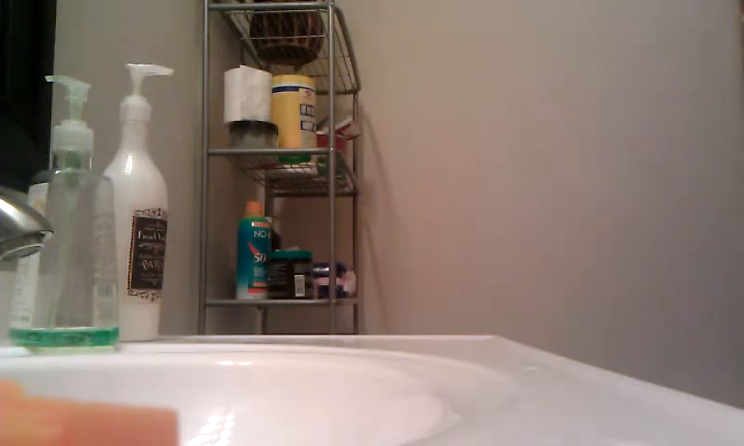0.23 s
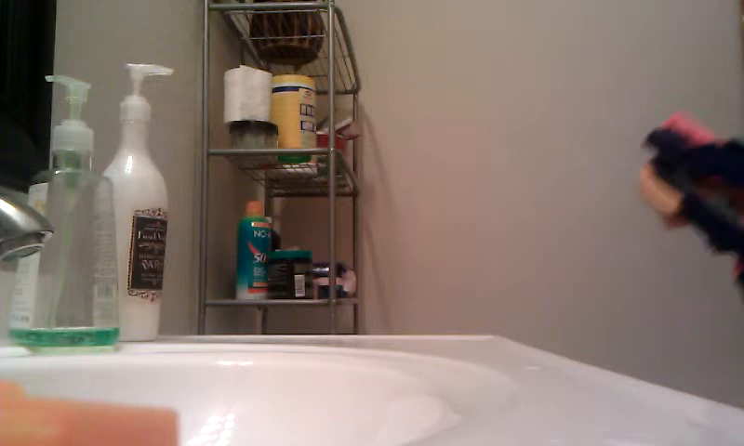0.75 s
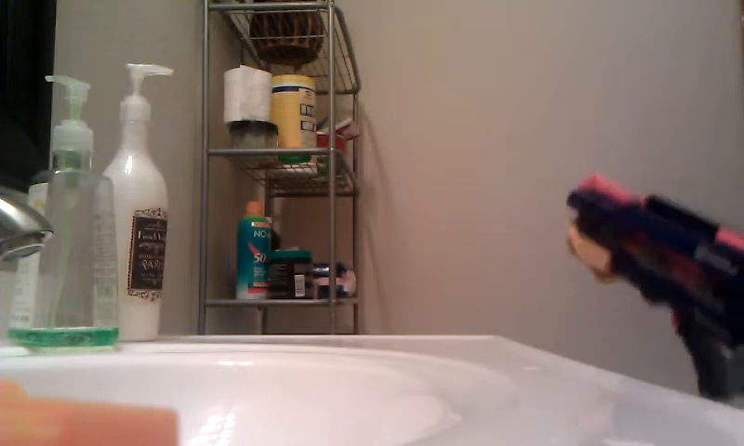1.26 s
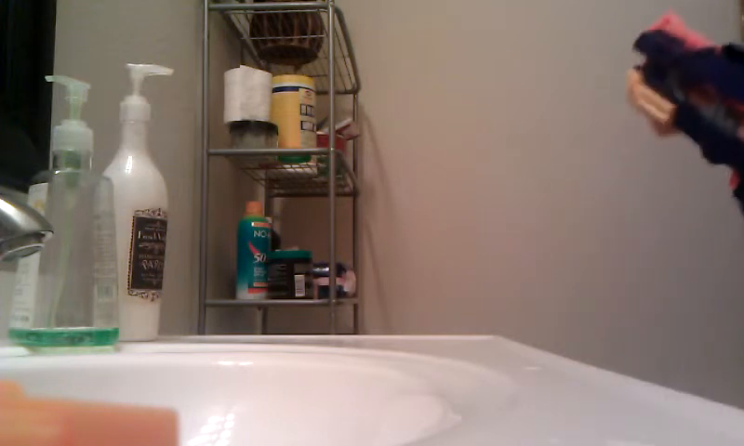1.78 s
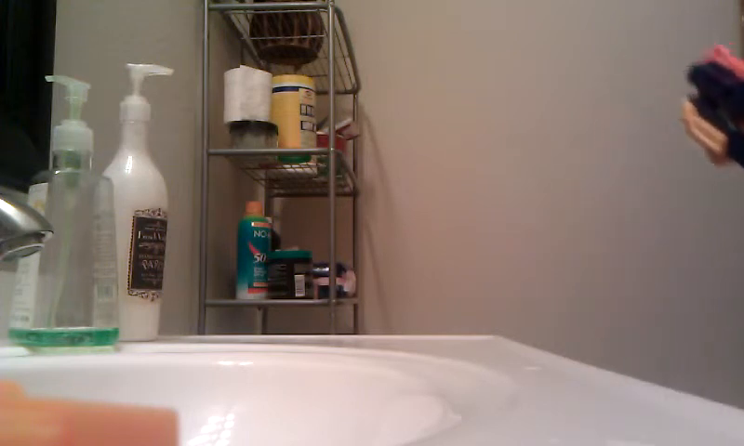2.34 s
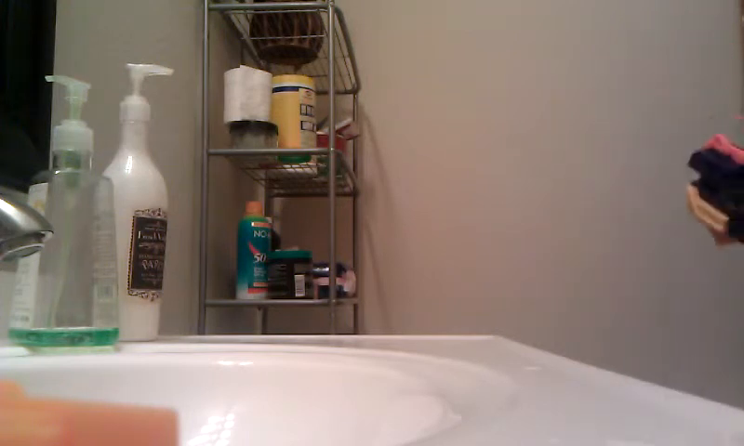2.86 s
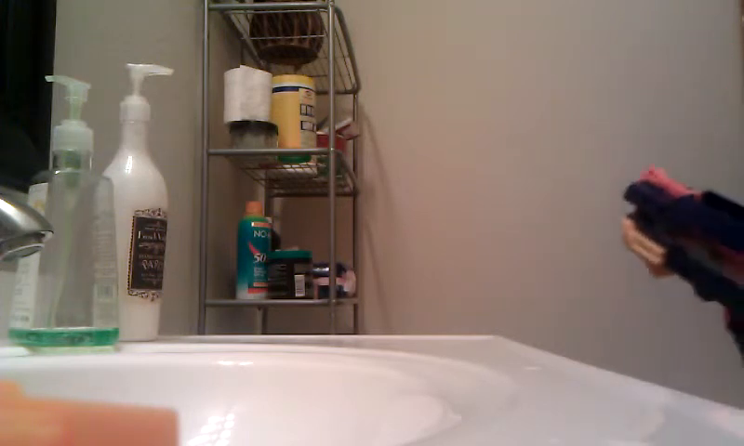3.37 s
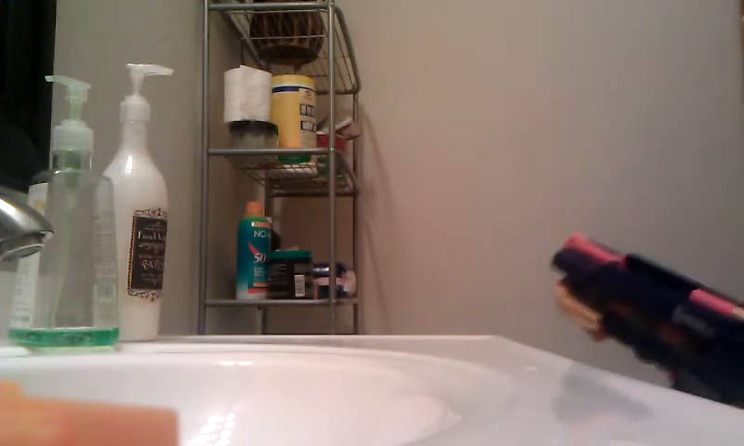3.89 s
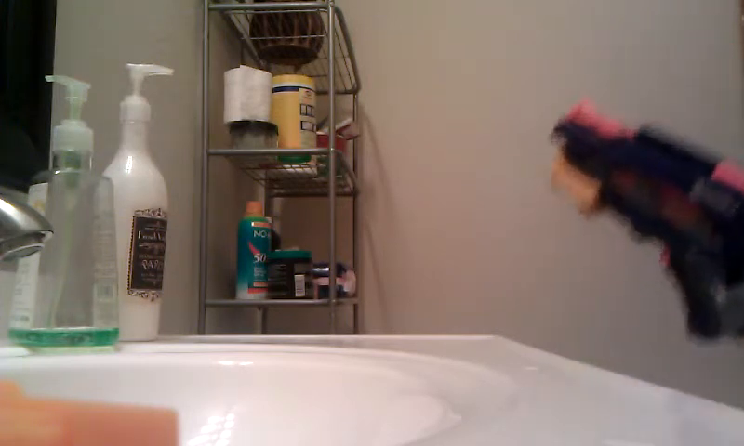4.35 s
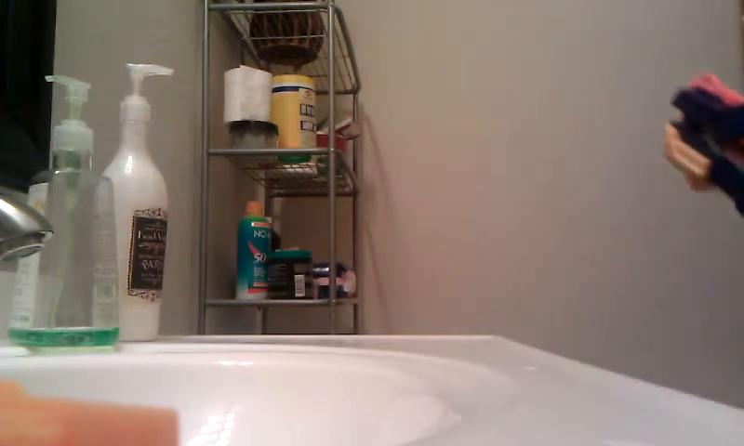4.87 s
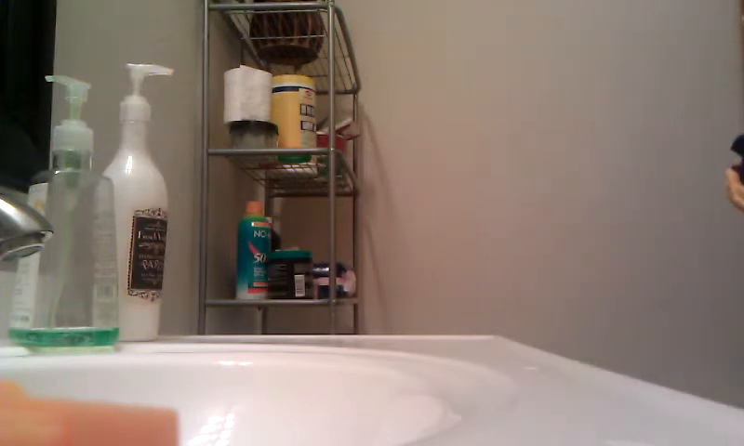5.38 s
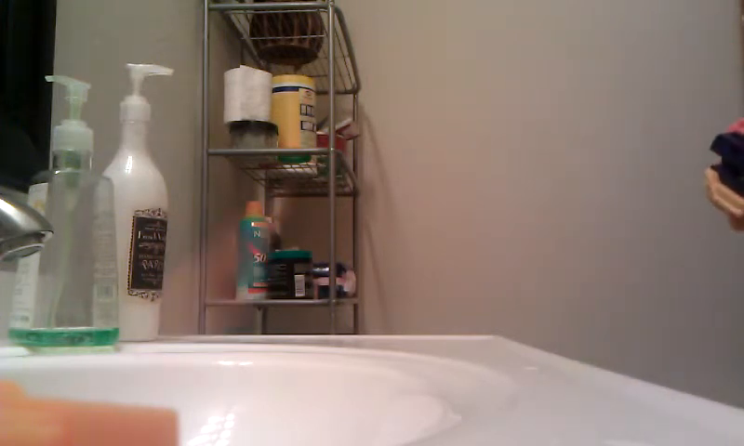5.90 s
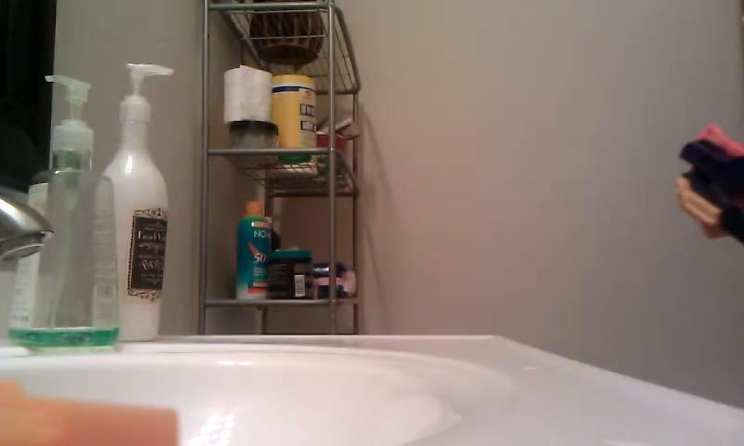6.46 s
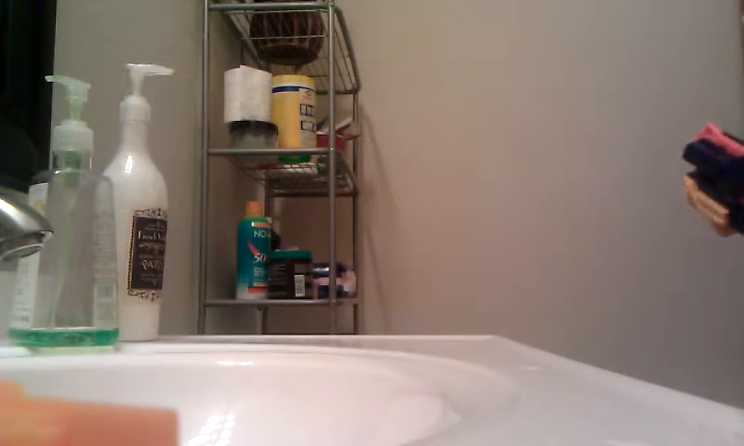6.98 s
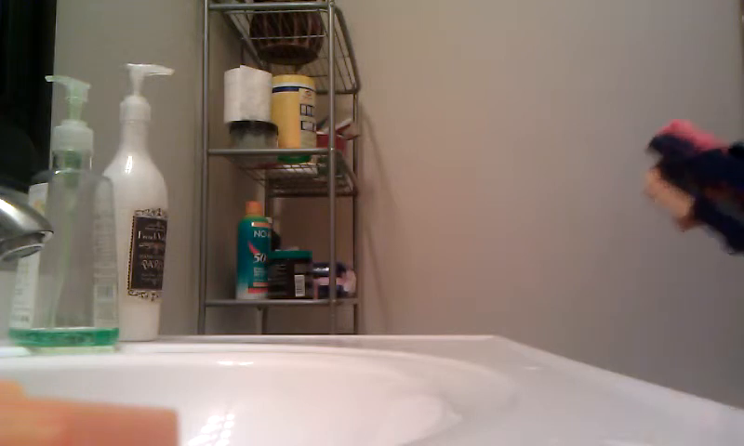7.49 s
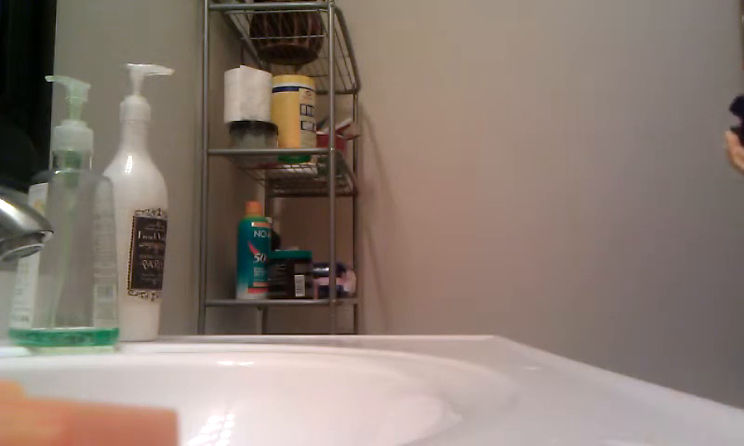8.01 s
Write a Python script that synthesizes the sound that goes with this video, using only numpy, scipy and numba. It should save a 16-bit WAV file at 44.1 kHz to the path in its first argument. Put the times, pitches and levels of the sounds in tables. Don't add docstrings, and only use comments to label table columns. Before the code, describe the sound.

Busy hard plastic clacks, pops and rattles of a toy gun being handled and shot twice, boxy and overloaded in a reverberant bathroom.

```python
import sys
import numpy as np
from scipy import signal
from scipy.io import wavfile
from scipy.ndimage import uniform_filter1d
from numba import njit

SR = 44100
rng = np.random.default_rng(int(sys.argv[2]) if len(sys.argv) > 2 else 0)


def volts_from_decibels(level):
    exponent = np.asarray(level, float) / 20
    return 10 ** exponent


def pcm_store(signal):
    levels = np.round(np.clip(np.atleast_2d(signal), -1, 1) * 32767)
    wavfile.write(sys.argv[1], SR, levels.astype(np.int16).T)


N = 363825
CLACK_N = 1500


def rms_one(x):
    return x / np.sqrt(np.mean(x ** 2) + 1e-20)


def at_hz(points, hz):
    table_hz, values = np.transpose(points)
    return np.interp(np.log(hz), np.log(table_hz), values)


def band(x, low, high):
    return signal.sosfilt(signal.butter(2, [low, high], "band", fs=SR, output="sos"), x)


def clack(level_db, bright_db, ring_hz, wide_db, ring_db, chance):
    low_share = 0.46
    low_db = wide_db - low_share * bright_db
    high_db = wide_db + (1 - low_share) * bright_db
    t = np.arange(len(chance)) / SR
    crack = .025 * chance * np.exp(-t / .008)
    crack[0] += 1
    lows = volts_from_decibels(low_db + 1.5) * band(crack, 86, 756)
    mids = band(crack, 1113, 2763)
    highs = volts_from_decibels(high_db + 4.0) * band(crack, 3040, 9230)
    ring = np.sin(2 * np.pi * ring_hz * t) * np.exp(-t / 0.0027)
    ring = volts_from_decibels(ring_db - 15.5) * ring / np.sqrt(np.sum(ring ** 2))
    return volts_from_decibels(level_db) * (mids - lows - highs + ring)


def blaster():
    # (t/s, level/dB, brightness/dB, shell ring f/Hz)
    shots = [
        (2.6034, -11.5, 1, 348),
        (5.4343, -13, -.6, 291),
    ]
    cocking = [
        (0.0014, -2, -7, 633),
        (1.074, -14, -6.5, 866),
        (1.8873, -10, 7, 768),
        (3.8759, -10, -2.5, 848),
        (4.8013, -8, 4, 650),
        (7.069, -10, -1.5, 657),
        (7.6574, -5, 4.5, 640),
        (8.2166, -5.5, -0.5, 750),
    ]
    latches = [(.380, -10.5, 8.5, 820), (.7979, -9.5, 4.5, 683), (1.4587, -3, 3, 1147),
               (1.7554, -8, 3.5, 900), (2.597, -19, -2, 1400), (3.478, -26.5, -17, 910),
               (3.492, -7.5, -8, 793), (3.6132, -7.5, 6, 930), (4.311, -1.5, 1.5, 2530),
               (5.427, -16.5, -1, 1170), (6.4315, -8.5, 6.5, 1406), (6.5985, -14, 1, 1830),
               (6.923, -22, 10, 2160), (7.059, -12.5, -16, 747), (7.4957, -1.5, 0.5, 2550)]
    knocks = [(.2975, -9.5, 7, 1880), (.3294, -10.5, -8, 1550), (.5871, -11, 1, 1460),
              (.6535, -9, -1.5, 745), (.925, -10.5, 5, 1560), (1.4212, -13.5, -3, 720),
              (1.668, -14, -14, 1500), (1.6755, -4, -11.5, 710), (2.099, -15, -5, 1790),
              (2.2144, -12, 9, 1390), (2.566, -18.5, -5, 1620), (3.0834, -17, -5, 626),
              (3.1194, -20, 6, 1640), (3.2361, -6, -7, 1620), (3.512, -11, .1, 1900), (3.7314, -11, 5, 750),
              (4.2867, -12, -14, 554), (4.5176, -11.5, 11.5, 1610), (5.2146, -20.5, -1, 1710),
              (5.3268, -33, -11, 724), (5.8845, -22, -19.5, 820), (6.2701, -16, -7, 682),
              (6.551, -14, -8, 1470), (6.588, -9, -3, 1300), (6.9644, -21, 10, 696),
              (7.3065, -9, 9.5, 1980), (7.4744, -14.5, -17, 1150), (8.1286, -9.5, 3, 1580)]
    thumps = [(1.273, -8.5, 12, 332), (2.4663, -27, -7, 700), (2.9681, -5.5, -7.5, 900),
              (4.0472, -11, -13.5, 706), (4.121, -12.5, 15, 331), (5.0101, -14.5, -6.5, 905),
              (5.2787, -19.5, -3, 810), (5.3148, -14, 1, 830), (6.0181, -13, -16, 560),
              (6.3139, -12, -4.5, 750), (6.7509, -14, -2, 990), (6.9012, -17, -2, 1040),
              (7.6204, 2, -4, 890), (7.8994, -9.5, -13, 790)]
    pops = [(.5316, -17, 14, 1640), (1.093, 0.5, 9.5, 1915), (1.8047, -6, 10, 1590),
            (2.2328, -21.5, -6, 1550), (3.755, 2.5, 4, 1604), (4.62, -5, 7, 3860), (5.1896, -16, 5, 1660),
            (6.255, -19.5, -7, 1310), (6.288, -15, -1, 1300), (6.6205, -11.5, -11, 1250),
            (7.0065, -17.5, 4, 1550), (7.4308, -19, 12, 1920), (8.022, -21, 2.5, 2640)]
    rings = [(.7001, -16, 9, 864), (.893, -9, 4, 1740), (.9639, -14.5, 8, 1810), (1.0705, -8.5, -4.5, 806),
             (2.4663, -27, -2, 1140), (2.4668, -30, 2, 2190), (2.4725, -33, .1, 3950),
             (3.198, -11, -1, 307), (3.528, -5, 1, 1510), (6.0186, -26, 7, 3500), (6.349, -4.5, 0, 1563)]
    # (contacts, extra blow strength/dB, lows and highs against the middle/dB, shell ring/dB)
    kinds = [(shots, 33, -6, -3.5),
             (cocking, 16, -5.5, -4),
             (latches, 5.5, -8, -6),
             (knocks, 0, -9, -14),
             (thumps, 0, -6.5, 1.3),
             (pops, 0, -8.5, 3.1),
             (rings, 0, -8.5, 10)]
    spots = np.zeros((3, N + CLACK_N))
    k = 0
    for contacts, extra_db, wide_db, ring_db in kinds:
        for s, level_db, bright_db, ring_hz in contacts:
            i = round(s * SR)
            chance = rng.standard_normal(CLACK_N)
            hit = clack(level_db + extra_db, bright_db, ring_hz, wide_db, ring_db, chance)
            spots[k % 3, i:i + CLACK_N] += hit
            k += 1
    return spots[:, :N]


def close_sound(count):
    t = np.arange(count) / SR
    response = volts_from_decibels(3) * rng.standard_normal(count) * np.exp(-t / .006)
    response[0] += volts_from_decibels(9.5)
    return response


def snaps():
    # (t/s, level/dB, brightness/dB, shell ring f/Hz)
    hits = [(.381, -10, 6, 910), (3.198, -8, 1.5, 330), (4.048, -9, -6, 615), (4.122, -10.5, 10, 2600),
            (4.6205, -1.5, 7.5, 3880), (6.019, -14, .1, 696), (6.923, -11, 7, 2160), (7.06, -8, -3, 690),
            (7.307, -8.5, 2.5, 406), (8.1295, -15, 1.5, 1560), (.8935, -7, 3, 1710), (6.3485, -6, .1, 1570),
            (.9645, -10.5, 5, 2400), (3.232, -9, .1, 1600), (6.965, -16, 5, 3000), (3.2005, -12, -24, 190),
            (6.0205, -19, -22, 480), (7.309, -16, -22, 240), (1.4595, -12, -18, 220), (.47, -24, -22, 210)]
    out = np.zeros(N + CLACK_N)
    for s, level_db, bright_db, ring_hz in hits:
        i = round(s * SR)
        chance = rng.standard_normal(CLACK_N)
        out[i:i + CLACK_N] += clack(level_db, bright_db, ring_hz, -5, -4.5, chance)
    return signal.fftconvolve(out, close_sound(CLACK_N))[:N]


def rattle(per_s=330, spread_db=4.0):
    # (t/s, level/dB)
    handling = [(0.0, -18), (0.41, -20.5), (1.06, -17.5), (1.31, -35), (1.6, -23), (2.14, -26), (2.3, -49),
                (3.0, -30), (3.33, -46), (3.54, -10), (3.7, -42), (4.16, -44), (4.39, -16.5), (5.3, -34),
                (5.61, -7.5), (6.11, -57), (6.34, -17), (6.55, -40.5)]
    s, level_db = np.transpose(handling)
    sizes = volts_from_decibels(spread_db * np.minimum(rng.exponential(1, N), 4)) * rng.choice([-1, 1], N)
    ticks = sizes * (rng.random(N) < per_s / SR)
    motion = volts_from_decibels(np.interp(np.arange(N) / SR, s, level_db))
    return motion * band(ticks, 350, 13000)


def bathroom():
    # (f/Hz, T60/s)
    decay = [(200, 0.47), (500, 0.57), (1000, 0.62), (2000, 0.48), (4000, 0.53), (8000, 0.45)]
    # (f/Hz, level/dB, T60/s)
    modes = [(267.3, -23, 0.52), (320.6, -26.5, 0.5), (433.3, -24.5, 0.57), (518.6, -26, 0.59),
             (683, -31, 0.53)]
    t = np.arange(SR) / SR
    edges = 70 * 2 ** np.arange(0, 7.6, .5)
    white = rng.standard_normal((2, SR))
    tail = np.zeros(SR)
    for k, (low, high) in enumerate(zip(edges, edges[1:])):
        t60 = at_hz(decay, np.sqrt(low * high))
        tail += band(white[k % 2], low, high) * volts_from_decibels(-60 * t / t60)
    tail *= volts_from_decibels(-1.5) * (1 - np.exp(-t / 0.0065))
    for hz, level_db, t60 in modes:
        phase = rng.uniform(0, 2 * np.pi)
        tail += volts_from_decibels(level_db - 60 * t / t60) * np.sin(2 * np.pi * hz * t + phase)
    return tail + close_sound(SR)


def rumble():
    # (peak t/s, half length/s, rise/dB)
    swells = [
        (2.45, 0.21, 8),
        (5.1, 0.18, 2),
        (6.05, .3, 14),
        (8.1, 0.25, 13),
    ]
    hum_hz, level_db = 155, -75.5 + 25.5
    t = np.arange(N) / SR
    swell_db = sum(rise_db * np.exp(-((t - s) / half) ** 2) for s, half, rise_db in swells)
    note = rms_one(band(rng.standard_normal(N), hum_hz * .96, hum_hz * 1.04))
    under = volts_from_decibels(.1) * rms_one(band(rng.standard_normal(N), 64, 115))
    return volts_from_decibels(level_db + swell_db) * (note + under)


def scene():
    spots = blaster()
    spots[0] += volts_from_decibels(-21.5) * rattle()
    in_room = sum(signal.fftconvolve(spot, bathroom())[:N] for spot in spots)
    heard = in_room + snaps()
    floor = volts_from_decibels(-72) * rng.standard_normal(N)
    return np.tile(volts_from_decibels(5.5) * heard + floor + rumble(), (2, 1))


@njit
def follow(power, up, down):
    out, level = np.empty_like(power), power[0]
    for i in range(len(power)):
        level += (up if power[i] > level else down) * (power[i] - level)
        out[i] = level
    return out


def limiter(x):
    hold_db, attack_s, release_s = -19.5 + 2.5, 0.00017, 0.0018
    smooth = signal.lfilter([.02], [1, -.98], x ** 2)
    level = np.sqrt(follow(smooth, 1 / (attack_s * SR), 1 / (release_s * SR)))
    level = uniform_filter1d(level, size=110, origin=-22)
    return x / np.maximum(1, level / volts_from_decibels(hold_db))


def roll_off(x):
    return signal.sosfilt(signal.butter(12, 16480, fs=SR, output="sos"), x)


def record(dry):
    # (f/Hz, level/dB)
    mic = [(35, -80), (60, -46.5), (288, -12.5), (312, -7), (568, -4), (728, 0), (972, -6.5), (1560, -9),
           (3490, -13), (5060, -16.5), (5850, -24), (7490, -15), (8300, -1.5), (10800, -80.5),
           (18300, -120)]
    cutoff_hz, overload = 8525, 0.67
    hz = np.linspace(0, SR / 2, 2049)
    colour = signal.firwin2(2047, hz, volts_from_decibels(2 * np.maximum(at_hz(mic, hz + 1), -45)), fs=SR)
    x = signal.fftconvolve(dry[0], signal.minimum_phase(colour))[:N]
    x = signal.sosfilt(signal.cheby2(12, 75, cutoff_hz * 1.0856, fs=SR, output="sos"), x)
    x = np.clip(x, -overload, overload)
    x = signal.sosfilt(signal.cheby2(10, 60, 17600, fs=SR, output="sos"), x)
    mix = np.tile(limiter(x), (2, 1))
    return roll_off(mix)


dry = scene()
out = record(dry)
pcm_store(out)
```